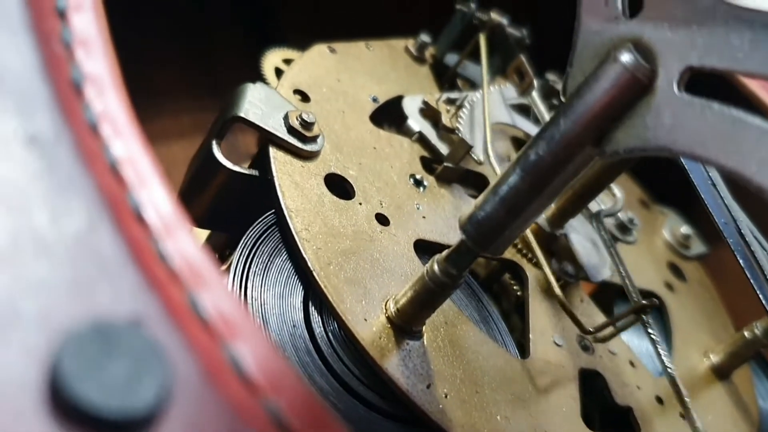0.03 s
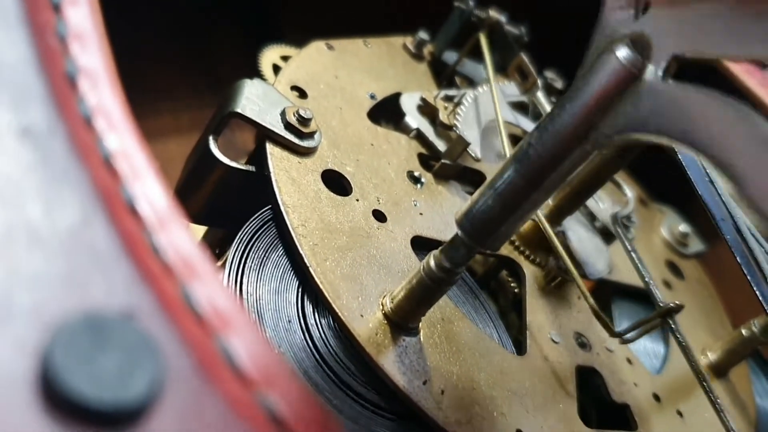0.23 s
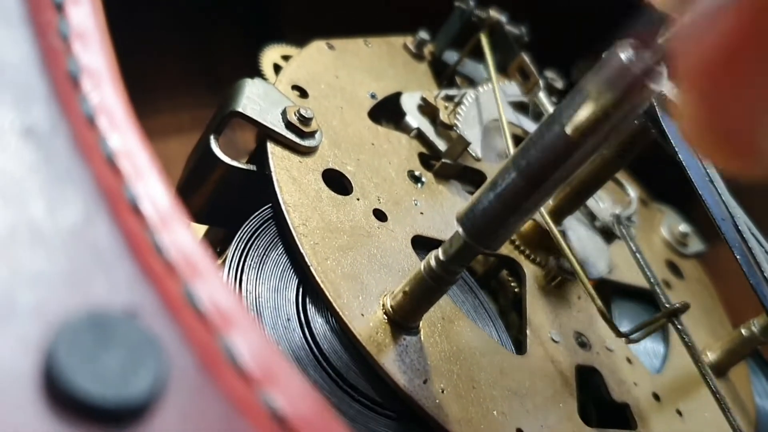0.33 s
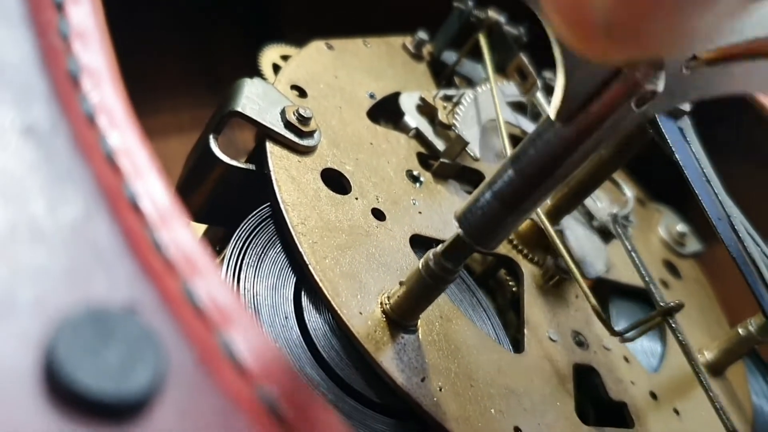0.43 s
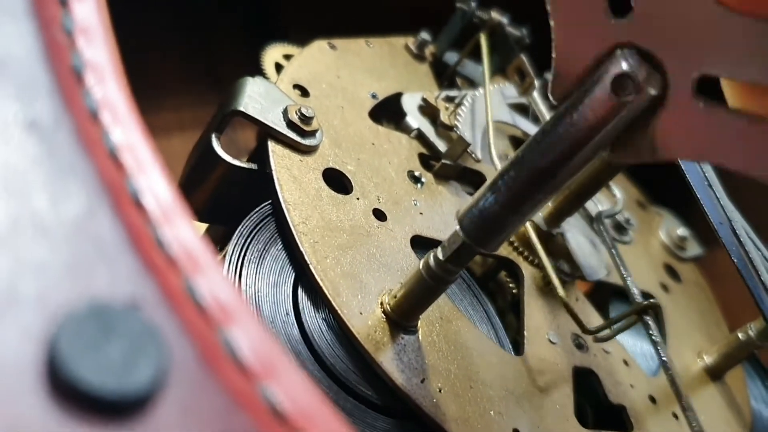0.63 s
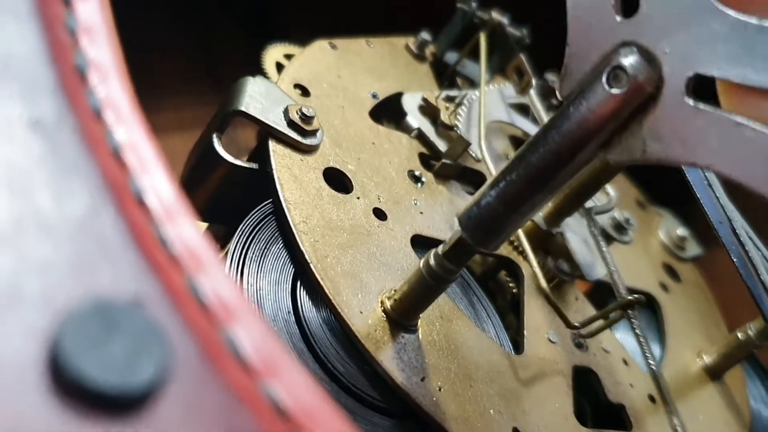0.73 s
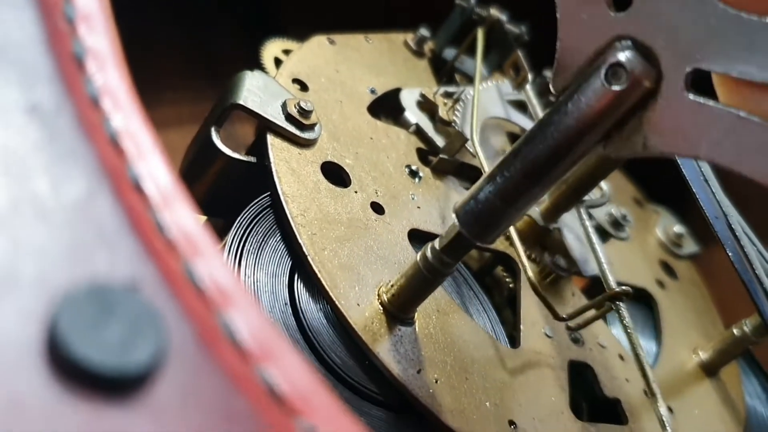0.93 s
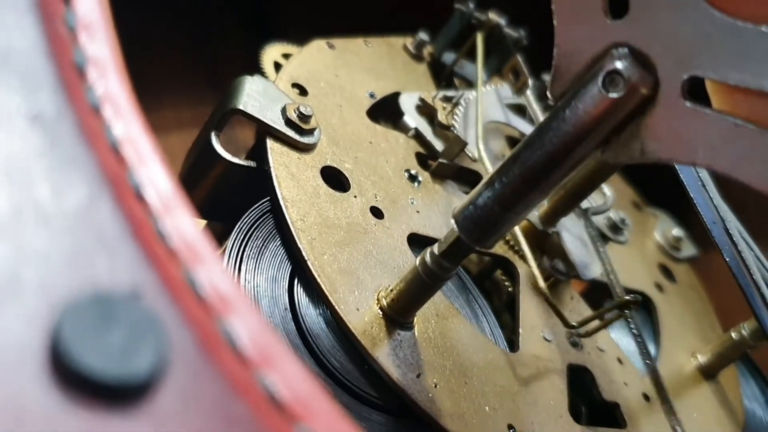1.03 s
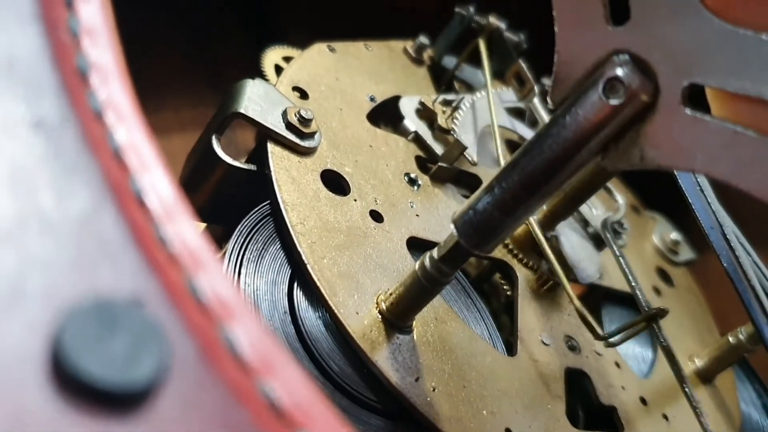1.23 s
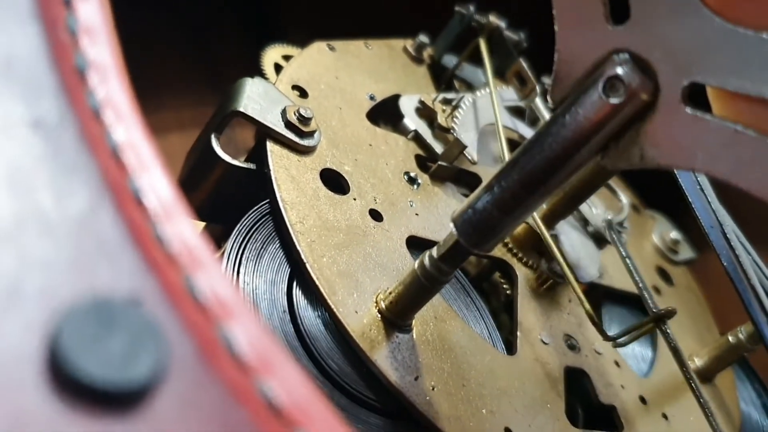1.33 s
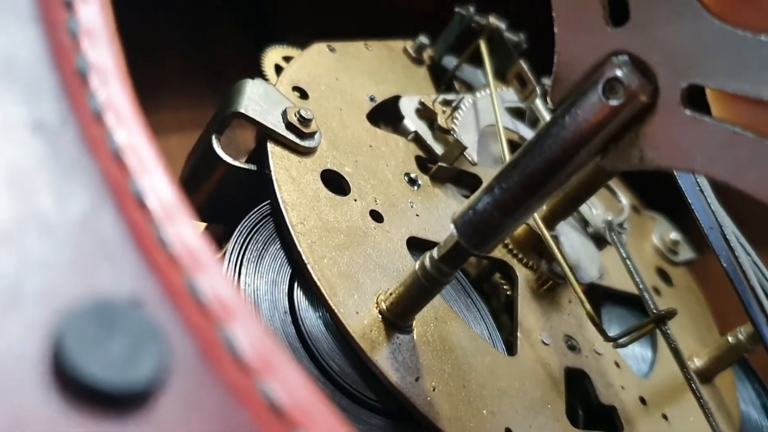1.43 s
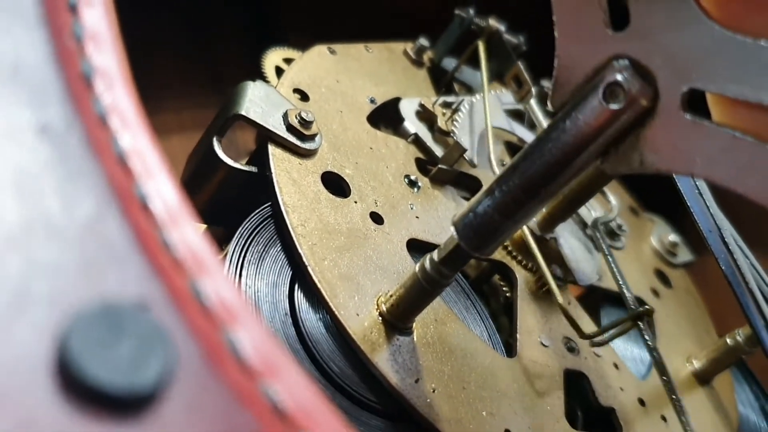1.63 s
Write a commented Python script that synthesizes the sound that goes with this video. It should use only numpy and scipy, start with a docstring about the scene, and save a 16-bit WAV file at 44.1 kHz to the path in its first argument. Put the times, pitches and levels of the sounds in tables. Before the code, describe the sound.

Sharp, uneven ratchet clicks of a clock spring being wound, with soft thumps, close by.

```python
"""A ratchet clicks as a clock's mainspring is wound with a steel key, close by in a small room.
The pawl snaps over the teeth in an uneven run, and each impact excites the modes of the steel parts
and the brass plates. The case rocks and thumps, the loose key knocks on its arbor, and friction
sounds as the hand slides to a new grip. Reverberation and a faint room tone lie behind."""
import sys
import numpy as np
from scipy import signal
from scipy.fft import rfft, irfft, next_fast_len
from scipy.io import wavfile
from scipy.ndimage import uniform_filter1d

SR = 44100
rng = np.random.default_rng(int(sys.argv[2]) if len(sys.argv) > 2 else 0)


def store_pcm(level_fs):
    """Save levels as 16-bit WAV."""
    pcm = np.round(np.clip(level_fs, -1, 1) * 32767).astype(np.int16)
    wavfile.write(sys.argv[1], SR, np.atleast_2d(pcm).T)


N = 74970

# pawl impacts: t/s, snap level/dB, plate level/dB, snap T60/s, left over right/dB,
# treble shelf gain/dB, shelf corner f/Hz
PAWL_IMPACTS = [(0.2022, -38, -62, 0.011, 0, -10, 9000), (0.2102, -29.5, -32, 0.063, -1, -20.5, 7000),
                (0.2185, -32, -31.5, 0.076, -1, -10, 8900), (0.3626, -24.5, -28, 0.028, -0.5, 2, 11000),
                (0.3899, -25.5, -37, .022, 1, 4.5, 4460), (0.4351, -17.5, -27.5, 0.019, -1, 3.5, 12500),
                (.5170, -19, -28, 0.015, 0, 0, 10900), (0.5771, -36.5, -56, 0.025, -1.5, 5.5, 6000),
                (0.6041, -19.5, -23.5, 0.027, -0.5, -2, 7000),
                (0.7037, -20.5, -23.5, 0.041, -0.5, 3.5, 8900), (0.7728, -31.5, -34, .045, -2, -2, 9000),
                (0.777, -36.5, -49, 0.027, 4, 5, 6150), (.7880, -17.5, -24, .030, 0, -1, 9000),
                (0.912, -36, -38, 0.12, 2.5, -11, 6500), (0.92, -46, -34, .035, 0, -5, 8040),
                (0.9722, -53.5, -55, 0.15, -0.5, -2.5, 9000)]
# spectrum of the snap: f/Hz, level/dB
SNAP_SPECTRUM = [(300, -32.5), (1200, -0.5), (2500, -8), (3700, -11.5), (4300, -5.5), (5450, -3),
                 (5850, -9), (6400, -3.5), (7000, -6.5), (7800, -3), (8500, -5), (9500, -6.5),
                 (10800, -1.5), (12000, -3), (13900, 1), (14600, -9), (15200, 6), (15900, -12),
                 (16450, -24), (16900, -29)]
# modes of the steel pawl and ratchet wheel: f/Hz, level/dB
STEEL_MODES = [(4220, -11), (4750, -21), (5290, -10.5), (5520, -16), (6400, -15), (7510, -38), (8000, -23),
               (10660, -36), (11510, -8), (12150, -27), (13260, -9), (13920, -26), (15050, -16),
               (15390, -3)]
# spectrum of the brass plates' dense, overlapping modes: f/Hz, level/dB
PLATE_SPECTRUM = [(100, -17.5), (280, -1.5), (420, -6), (550, -1), (680, -5), (800, 1), (980, -7.5),
                  (1200, -2), (1550, 1), (1720, -1.5), (1900, 3), (2100, 1.5), (2450, -16.5), (2900, -9),
                  (3500, -7.5), (4800, -12), (8000, -27), (16000, -52)]
# distinct modes of the plates: f/Hz, level/dB, T60/s
PLATE_MODES = [(768, -13.5, 0.065), (967, -16, 0.061), (1246, -15, 0.14), (1302, -15, 0.053),
               (1514, -12, .08), (1685, -21, 0.11), (1910, -3, 0.034), (1974, -5.5, 0.05),
               (2288, -13, 0.063), (2907, -15, 0.044), (3100, -15.5, 0.041), (4500, -19, 0.079),
               (4876, -23, .06)]
def ratchet(snap_rise_s=0.00061, plate_rise_s=0.0013, slip_growth_s=0.0012):
    """Impact excitation: the pawl slips, drops and rings steel and brass; gives (noise, clear modes)."""
    snaps, plates, steel, brass = np.zeros((4, 2, N))
    t = np.arange(SR // 4) / SR
    def mode(hz, t60, rise, spread_rad):
        """A damped sinusoid whose pitch and level vary a little with the load on each tooth."""
        hz = hz * (1 + 0.0049 * rng.standard_normal())
        gain = amp(2.5 * rng.standard_normal())
        phase = spread_rad * rng.standard_normal((2, 1))
        return gain * fade(t, rise, t60) * np.sin(2 * np.pi * hz * t + phase)
    for s, snap_db, plate_db, snap_t60, pan_db, treble_db, corner_hz in PAWL_IMPACTS:
        # the pawl slides off the tooth: a 10 ms swell that ends at the impact
        slip = (noise(len(t)) * np.exp(-t / slip_growth_s))[:, SR // 100::-1]
        add(snaps, s - slip.shape[1] / SR, amp(snap_db - 11) * slip)
        snap_gain = amp(snap_db) * pan(pan_db)
        shelf = lambda hz: amp(treble_db * hz ** 4 / (hz ** 4 + corner_hz ** 4))
        first_contact = amp(-3.5) * decay(t, t60=0.0037)
        envelope = first_contact + fade(t, snap_rise_s, snap_t60)
        add(snaps, s, snap_gain * filtered(envelope * noise(len(t)), shelf))
        steel_ring = sum(amp(db) * shelf(hz) * mode(hz, t60=0.016, rise=snap_rise_s, spread_rad=0.74)
                         for hz, db in STEEL_MODES)
        add(steel, s, snap_gain * steel_ring)
        add(plates, s, amp(plate_db) * fade(t, plate_rise_s, t60=0.067) * noise(len(t)))
        brass_ring = sum(amp(db) * mode(hz, t60, plate_rise_s, spread_rad=0.9)
                         for hz, db, t60 in PLATE_MODES)
        add(brass, s, amp(plate_db) * brass_ring)
    plate_pan = pan(db=2)
    dense_ring = plate_pan * amp(-5.5) * coloured(plates, PLATE_SPECTRUM)
    return coloured(snaps, SNAP_SPECTRUM) + dense_ring, steel + plate_pan * brass


# jolts to the case: t/s, level/dB, contact cutoff f/Hz (higher is harder), sway level/dB
JOLTS = [(0.211, -42, 500, -77), (0.369, -32.5, 320, -40.5), (0.3936, -26.5, 780, -51.5),
         (0.4161, -26, 376, -33.5), (.441, -38, 375, -56), (0.4634, -30.5, 780, -70),
         (.521, -38.5, 796, -65), (.586, -33, 300, -54), (.625, -30.5, 115, -37.5),
         (0.709, -25, 250, -28.5), (0.719, -17, 296, -44), (.741, -34.5, 253, -39), (.785, -25.5, 315, -33),
         (0.814, -31.5, 150, -39), (0.885, -39, 128, -41.5), (0.9734, -45, 714, -48),
         (1.105, -49.5, 306, -78)]
# modes of the case: f/Hz, level/dB, T60/s
CASE_MODES = [(71.5, -15, 0.23), (103.2, 0.5, 0.049), (145.8, 0.5, 0.0397), (198, -2, 0.065),
              (246.2, 0, 0.088), (288, -1, 0.036), (402.7, -6, 0.056), (529.4, 6, 0.032), (631, -12, 0.079)]
# modes of the whole clock swaying on its support: f/Hz, level/dB, T60/s
SWAY_MODES = [(42.8, -2, 0.54), (71.1, 1, 0.28)]
def case(rise_s=0.0017, phase_rad=0.16, path_lead_s=0.00005):
    """Free vibration: jolts sway the clock and ring its case, soft contacts only the low modes."""
    thumps = np.zeros((2, N))
    t = np.arange(SR) / SR
    def ring(hz, t60):
        """A damped mode that leads in phase on one side, chosen at random, and lags on the other."""
        lead = (phase_rad + 2 * np.pi * hz * path_lead_s) * rng.choice([-1, 1])
        phase = np.array([[lead], [-lead]])
        return fade(t, rise_s, t60) * np.sin(2 * np.pi * hz * t + phase)
    for s, level_db, cutoff_hz, sway_db in JOLTS:
        for hz, db, t60 in CASE_MODES:
            contact_lowpass = 1 / np.hypot(1, (hz / cutoff_hz) ** 2)
            add(thumps, s, amp(level_db + db) * contact_lowpass * ring(hz, t60))
        for hz, db, t60 in SWAY_MODES:
            add(thumps, s, amp(sway_db + db) * ring(hz, t60))
    return thumps


# knocks of the key: t/s, knock level/dB, tick level/dB
KEY_KNOCKS = [(0.306, -40, -47), (1.3419, -42, -52), (1.5903, -53, -80)]
# spectrum of the dull knock: f/Hz, level/dB
KNOCK_SPECTRUM = [(200, -22.5), (800, -9), (1050, -34), (1400, 0), (1700, 4.5), (1950, -7.5), (2200, -8),
                  (2500, -7.5), (3200, -39), (4500, -24.5), (16000, -44.5)]
# spectrum of its faint tick: f/Hz, level/dB
TICK_SPECTRUM = [(2000, -23), (3600, -9), (4500, 0.5), (5600, -12), (6500, -8), (9400, -9), (10500, -4),
                 (11300, 4.5), (12000, 7), (13000, -9), (14100, 1), (15700, -17.5)]
def key():
    """Damped impact: the loose key strikes its arbor and the hand absorbs the vibration."""
    knocks, ticks = np.zeros((2, 2, N))
    t = np.arange(SR // 4) / SR
    envelope = fade(t, rise=0.0016, t60=0.087)
    for s, knock_db, tick_db in KEY_KNOCKS:
        add(knocks, s, amp(knock_db) * envelope * noise(len(t)))
        add(ticks, s, amp(tick_db) * envelope * noise(len(t)))
    return coloured(knocks, KNOCK_SPECTRUM) + coloured(ticks, TICK_SPECTRUM)


# sliding strokes: t/s, rise/s, T60/s, rub level/dB, hiss level/dB, scrape level/dB,
# scrape centre f/Hz, scrape half-width/Hz
STROKES = [(.168, 0.014, 0.9, -52, -65, -62.5, 4570, 2000), (0.621, 0.024, 0.61, -43, -85, -64, 4500, 1500),
           (1.046, 0.015, 0.49, -49, -64.5, -70, 3400, 980),
           (1.060, 0.0027, 0.44, -59, -66, -58, 5030, 1370),
           (1.294, 0.035, 0.39, -54.5, -65, -83, 3420, 1000),
           (1.504, 0.0084, 0.49, -53, -87, -62.5, 2460, 400),
           (1.56, 0.037, .5, -53.5, -80, -64.5, 4050, 490),
           (1.612, 0.0033, 0.49, -71, -58.5, -62.5, 3680, 110)]
# spectrum of the midrange rub: f/Hz, level/dB
RUB_SPECTRUM = [(150, -44.5), (400, 5), (800, 3), (1100, 5), (1500, 8.5), (2200, -1.5), (3000, -22.5),
                (6000, -18.5), (16000, -22)]
# spectrum of the treble hiss: f/Hz, level/dB
HISS_SPECTRUM = [(1500, -14), (3000, 12.5), (4600, 2.5), (7000, 3), (10600, -3), (11900, 11.5), (13000, 10),
                 (14500, 1), (15500, -15)]
def rubbing(grain_db=2):
    """Sliding friction: skin on the key and the key on its arbor make short strokes of grainy noise."""
    rub, hiss, scrape = np.zeros((3, 2, N))
    t = np.arange(SR // 2) / SR
    for s, rise, t60, rub_db, hiss_db, scrape_db, centre_hz, half_width_hz in STROKES:
        roughness = unit(uniform_filter1d(rng.standard_normal(len(t)), size=120))
        stroke = fade(t, rise, t60) * unit(amp(grain_db * roughness))
        peak = lambda hz: 1 / (1 + ((hz - centre_hz) / half_width_hz) ** 2)
        band = unit(filtered(noise(len(t)), peak))
        add(rub, s, amp(rub_db) * stroke * noise(len(t)))
        add(hiss, s, amp(hiss_db) * stroke * noise(len(t)))
        add(scrape, s, amp(scrape_db) * stroke * band)
    return coloured(rub, RUB_SPECTRUM) + coloured(hiss, HISS_SPECTRUM) + scrape


# reverberation time: f/Hz, T60/s
REVERB_TIMES = [(60, 0.76), (250, 0.66), (1500, 0.41), (5000, 0.47), (15000, 0.31)]
# gain of the reverberation: f/Hz, level/dB
REVERB_SPECTRUM = [(40, -21), (110, -9), (240, -10), (600, -8.5), (1500, -12), (1950, -11.5), (2500, -7.5),
                   (5000, -15), (8000, -17.5), (12000, -12.5), (15600, -17.5), (16100, -45)]
def reverberation(x, build_s=0.0024, stretches=14):
    """Diffuse decay: in the room and the coiled spring each frequency dies away at its own rate."""
    wet = np.zeros((2, N + 2 * SR))
    position = np.linspace(0, stretches - 1, N)
    for k in range(stretches):  # each overlapping stretch of sound excites its own random tail
        hz, t, spectrum = signal.stft(rng.standard_normal((2, SR * 2 // 3)), SR, nperseg=256)
        envelopes = fade(t, build_s, along(REVERB_TIMES, hz)[:, None])
        tail = signal.istft(spectrum * envelopes, SR, nperseg=256)[1]
        near = np.flatnonzero(abs(position - k) < 1)
        stretch = x[:, near] * np.cos(np.pi / 2 * (position[near] - k))
        add(wet, near[0] / SR, signal.fftconvolve(stretch, tail / np.linalg.norm(tail[0]), axes=1))
    left, right = wet[:, :N]
    mid = left + right
    side = filtered(left - right, lambda hz: along([(100, 0.19), (800, 0.96)], hz))  # narrower bass
    stereo = np.array([mid + side, mid - side]) / 2
    return filtered(stereo, lambda hz: amp(along(REVERB_SPECTRUM, hz)))


# spectrum of the room tone: f/Hz, level/dB
ROOM_TONE_SPECTRUM = [(15, -29), (28, -9), (55, 0.5), (90, -2), (150, -6.5), (225, 1.5), (360, -10),
                      (600, -17), (1150, -33), (1600, -25.5), (2100, -33), (3200, -34.5), (3900, -30),
                      (5800, -39.5), (8100, -22.5), (9200, -31), (10800, -43.5), (12400, -28), (15700, -32)]
def room_tone(level_db=-64):
    """Stationary noise: a faint, steady background, strongest in the bass."""
    return amp(level_db) * coloured(noise(N, width=0.59), ROOM_TONE_SPECTRUM)


def amp(db):
    """Amplitude ratio of a level in decibels."""
    return 10 ** (np.asarray(db) / 20)


def unit(x):
    """Normalisation to rms 1."""
    return x / np.sqrt(np.mean(x ** 2) + 1e-20)


def along(points, hz):
    """Interpolation of (f/Hz, value) points on a logarithmic frequency axis."""
    f, values = np.transpose(points)
    return np.interp(np.log(hz + 1), np.log(f + 1), values)


def filtered(x, response):
    """Zero-phase filtering: the spectrum of x times a function of frequency."""
    size = next_fast_len(x.shape[-1] + SR // 4)
    gain = response(np.fft.rfftfreq(size, 1 / SR))
    return irfft(rfft(x, size) * gain, size)[..., :x.shape[-1]]


def coloured(x, points, size=4096):
    """Minimum-phase filtering: a causal colouring that keeps the power of white noise."""
    gain = unit(amp(along(points, np.fft.rfftfreq(size, 1 / SR))))
    cepstrum = irfft(np.log(gain + 1e-6))
    cepstrum[1:size // 2] *= 2
    cepstrum[size // 2 + 1:] = 0
    impulse_response = irfft(np.exp(rfft(cepstrum)))
    return signal.fftconvolve(x, impulse_response[None], axes=1)[:, :N]


def noise(count, width=1):
    """White stereo noise; width is the ratio of side to mid."""
    mid, side = rng.standard_normal((2, count))
    return unit(np.array([mid + width * side, mid - width * side]))


def add(track, s, sound):
    """Superposition of a sound on a track, starting at s seconds."""
    part = track[:, max(round(s * SR), 0):][:, :sound.shape[-1]]
    part += sound[..., :part.shape[1]]


def decay(t, t60):
    """Exponential damping: 60 dB down after t60 seconds."""
    return np.exp(-np.log(1000) * t / t60)


def fade(t, rise, t60):
    """Transient envelope: growth with time constant rise, times exponential damping."""
    return (1 - np.exp(-t / rise)) * decay(t, t60)


def pan(db):
    """Left and right gains for a level difference in decibels."""
    return amp(np.array([[db / 2], [-db / 2]]))


def scene(noise_top_hz=15800):
    """Superposition of the clock's direct sound, its reverberation and the room tone."""
    lowpass = lambda hz: hz < noise_top_hz
    clicks, modes = ratchet()
    impacts = clicks + case() + filtered(key(), lowpass)
    soft_noise = filtered(rubbing() + room_tone(), lowpass)
    reverb = reverberation(impacts + amp(-11) * modes)  # clear modes reach the room more weakly
    return impacts + modes + reverb + soft_noise


def record(dry, low_cut_hz=37.6, top_hz=17000):
    """Band limiting: the deepest bass and the highest treble are removed."""
    highpass = signal.butter(3, low_cut_hz, "highpass", fs=SR, output="sos")
    return filtered(signal.sosfilt(highpass, dry), lambda hz: hz < top_hz)


dry = scene()
out = record(dry)
store_pcm(out)
```